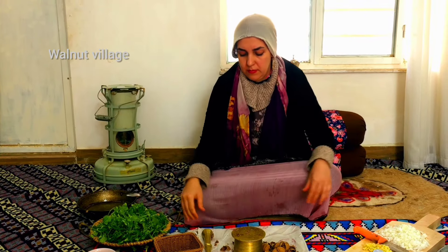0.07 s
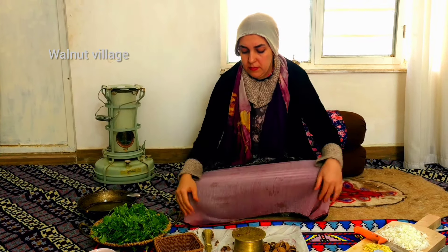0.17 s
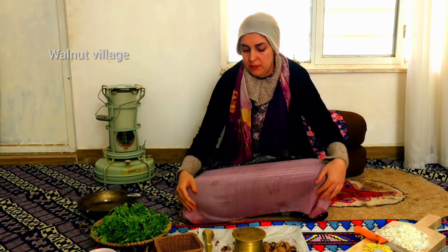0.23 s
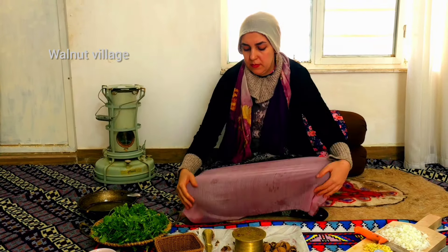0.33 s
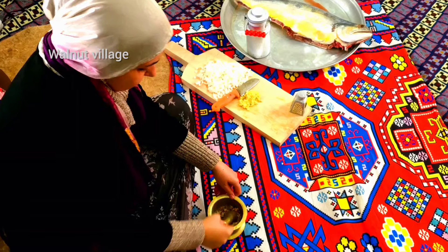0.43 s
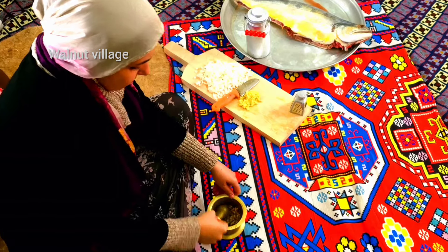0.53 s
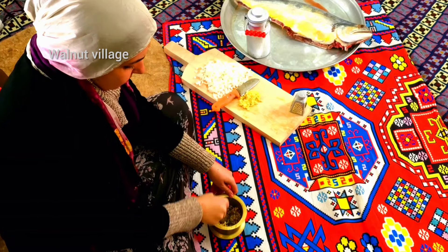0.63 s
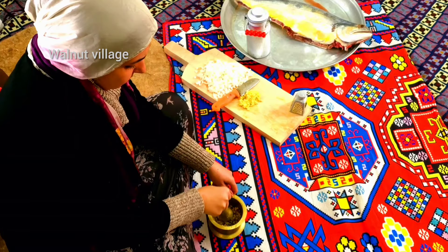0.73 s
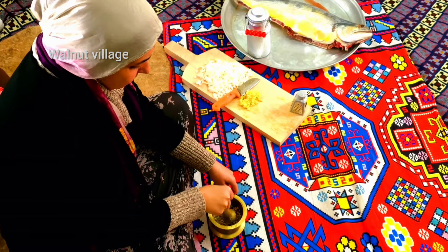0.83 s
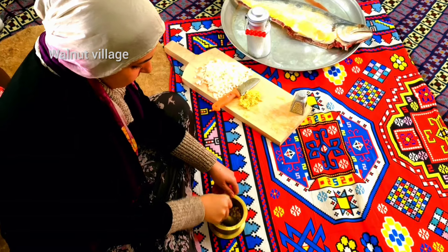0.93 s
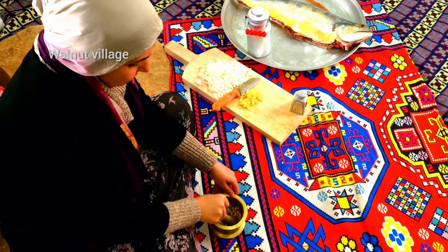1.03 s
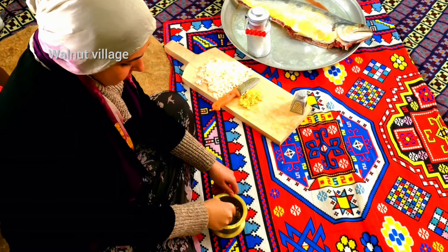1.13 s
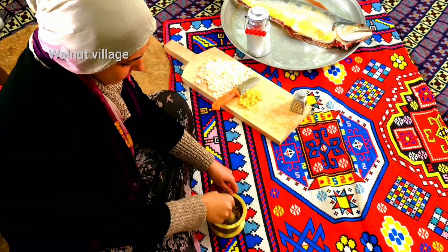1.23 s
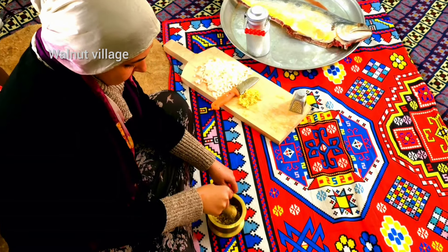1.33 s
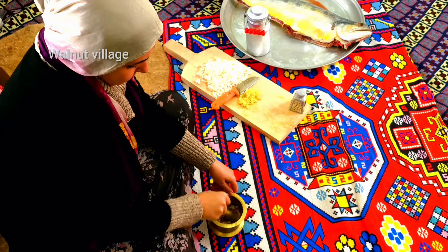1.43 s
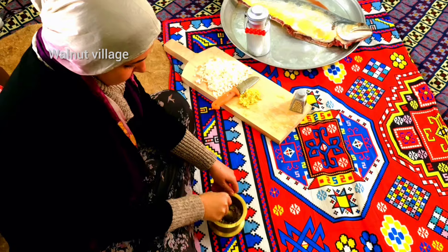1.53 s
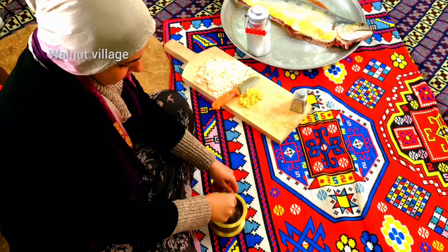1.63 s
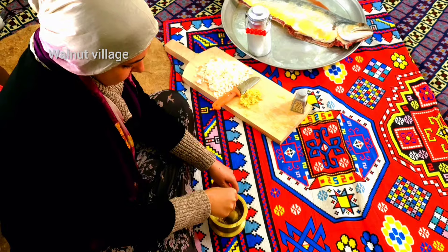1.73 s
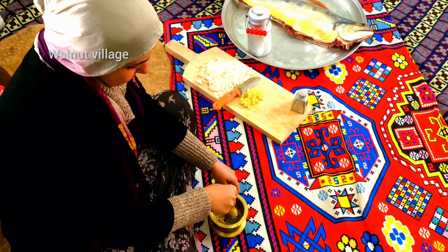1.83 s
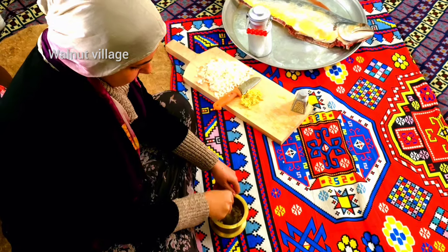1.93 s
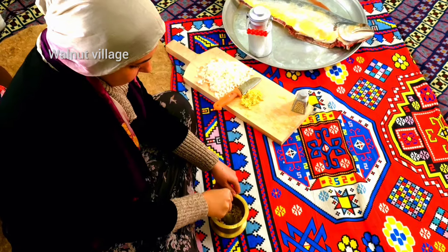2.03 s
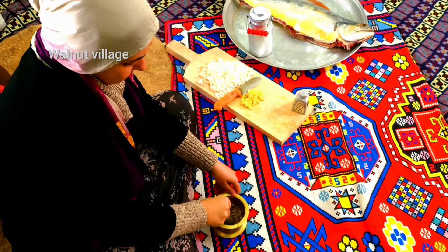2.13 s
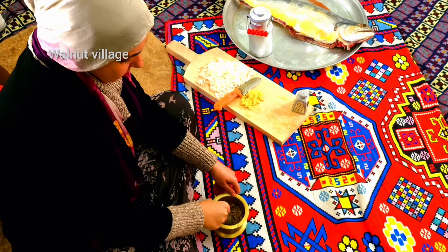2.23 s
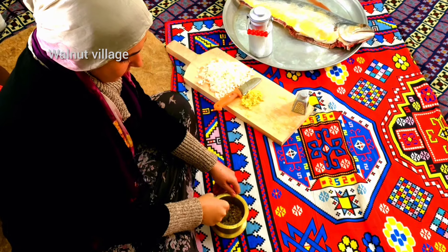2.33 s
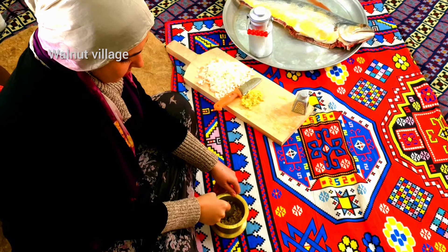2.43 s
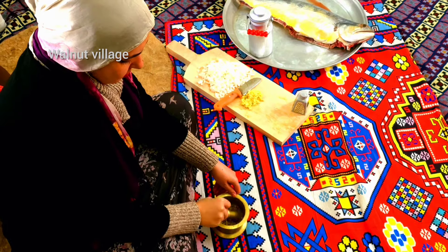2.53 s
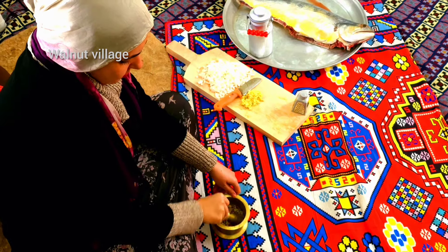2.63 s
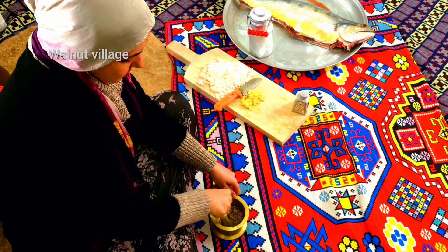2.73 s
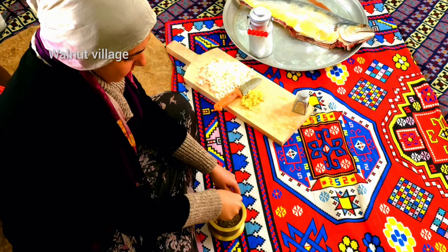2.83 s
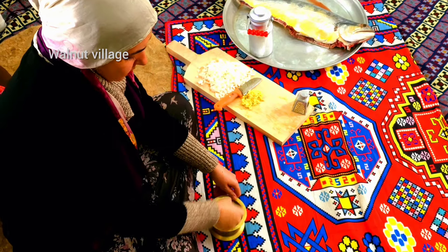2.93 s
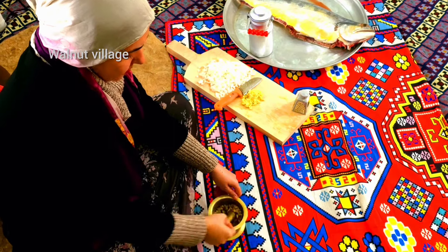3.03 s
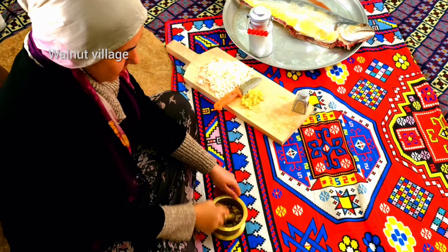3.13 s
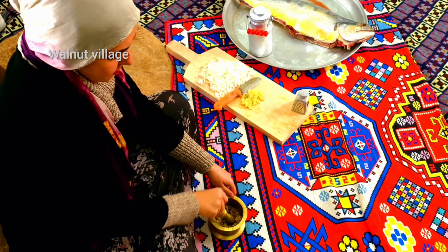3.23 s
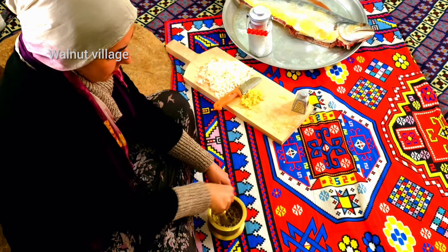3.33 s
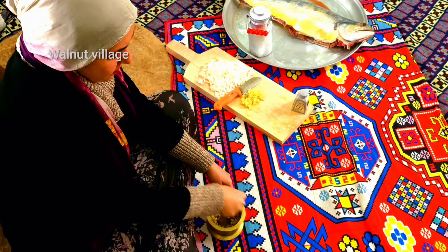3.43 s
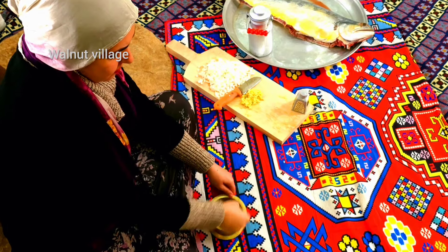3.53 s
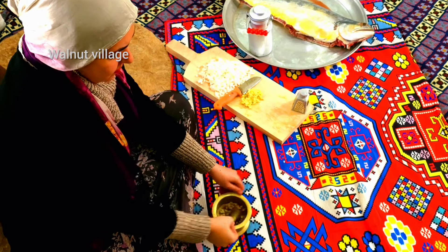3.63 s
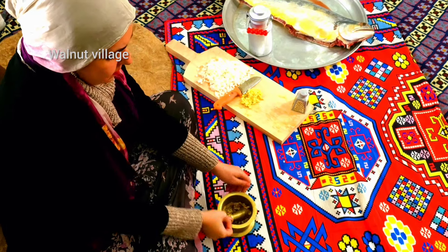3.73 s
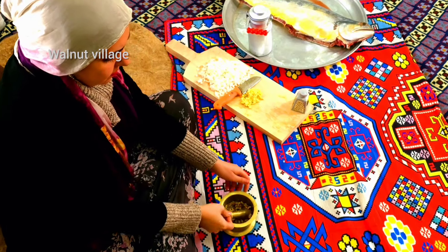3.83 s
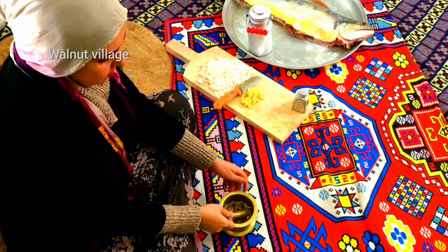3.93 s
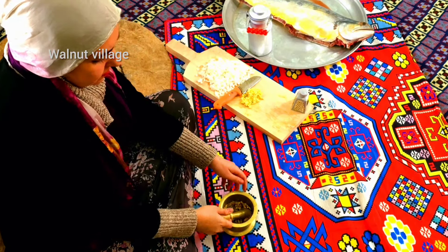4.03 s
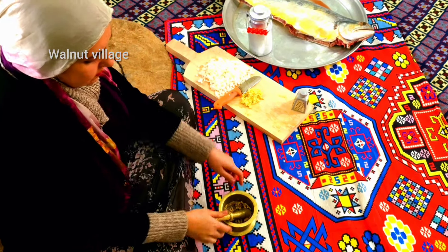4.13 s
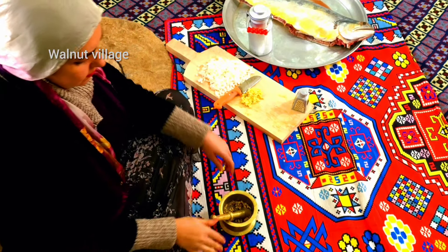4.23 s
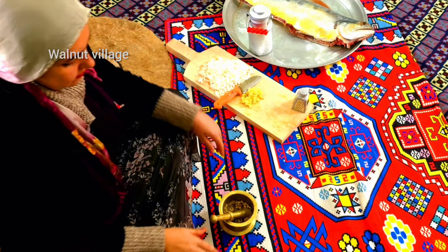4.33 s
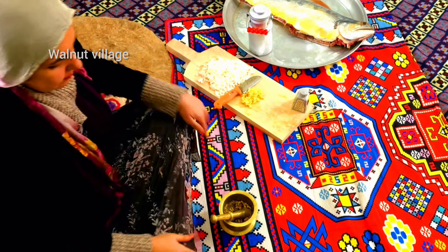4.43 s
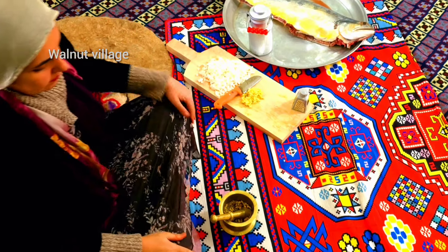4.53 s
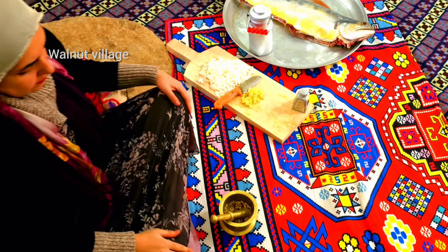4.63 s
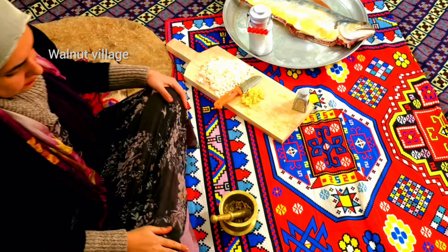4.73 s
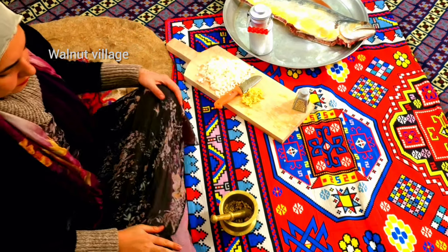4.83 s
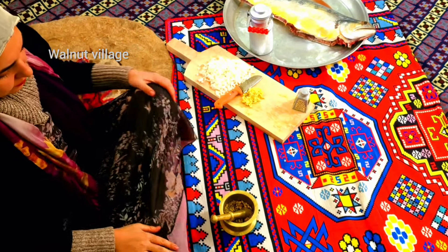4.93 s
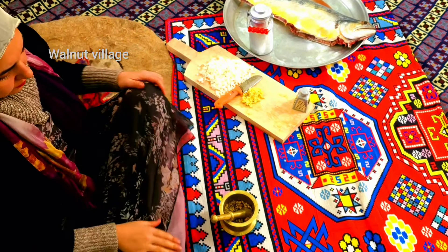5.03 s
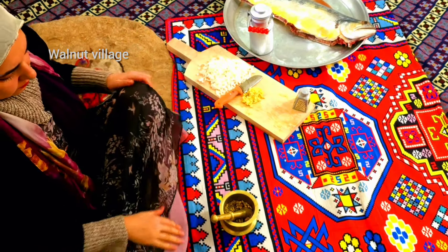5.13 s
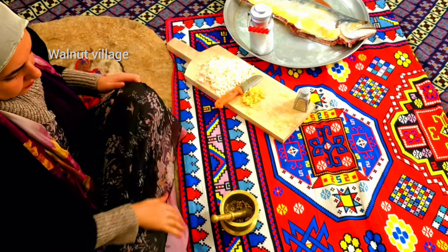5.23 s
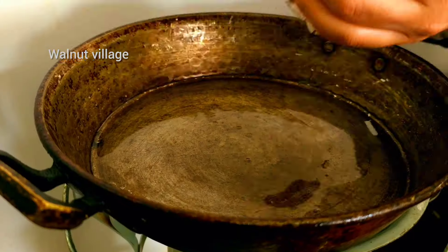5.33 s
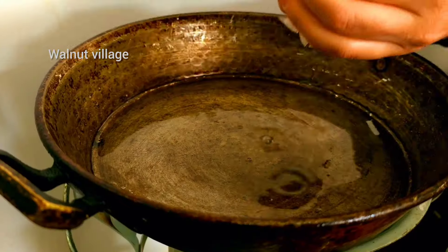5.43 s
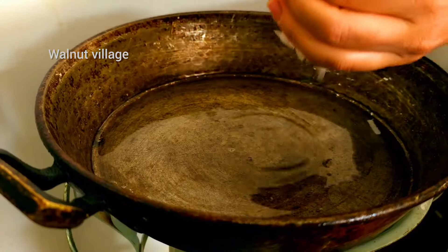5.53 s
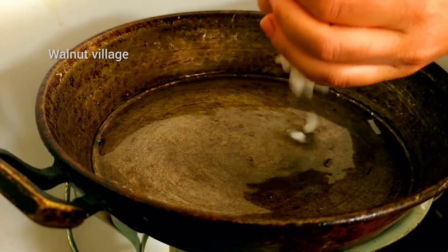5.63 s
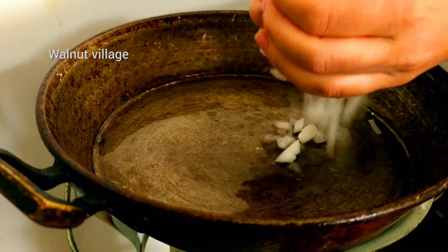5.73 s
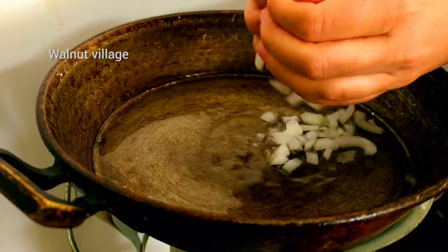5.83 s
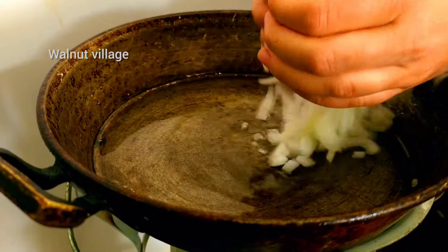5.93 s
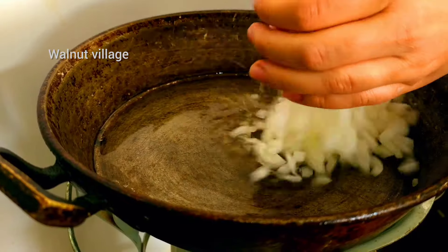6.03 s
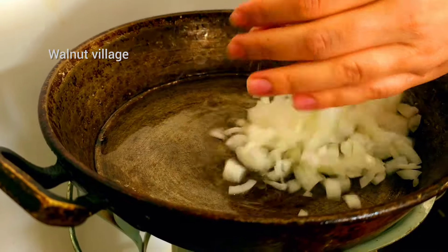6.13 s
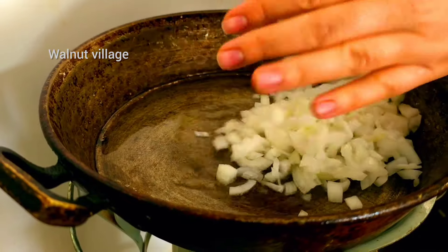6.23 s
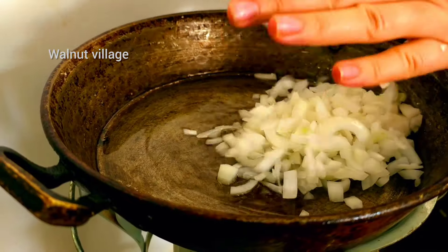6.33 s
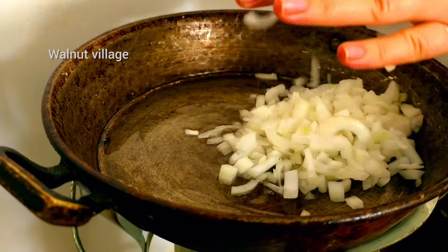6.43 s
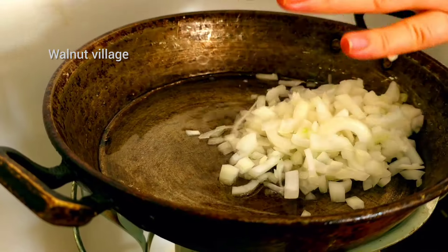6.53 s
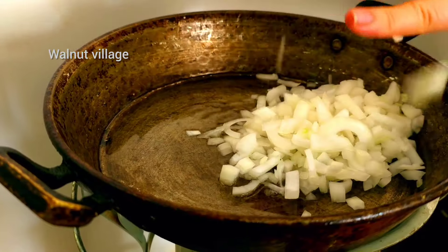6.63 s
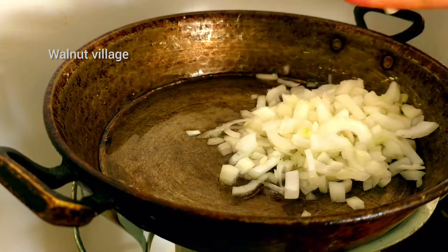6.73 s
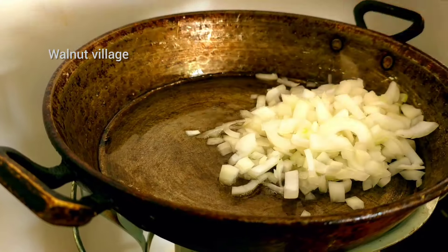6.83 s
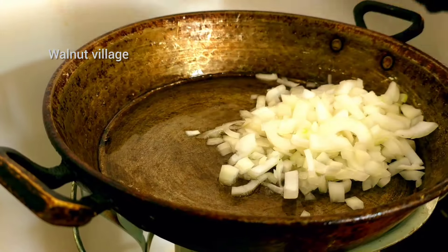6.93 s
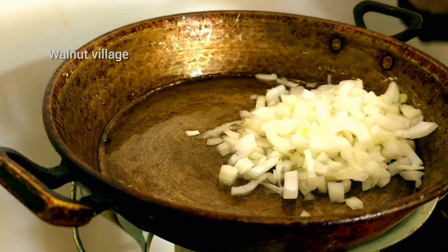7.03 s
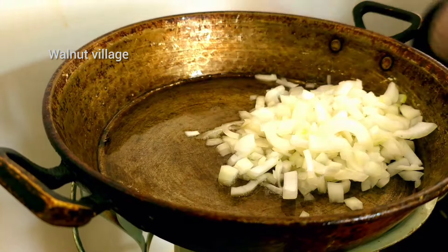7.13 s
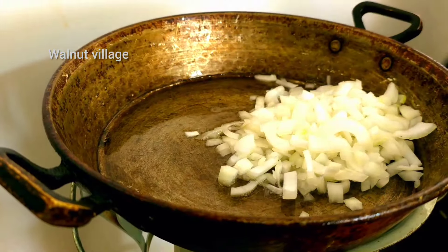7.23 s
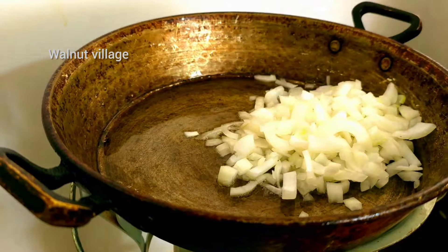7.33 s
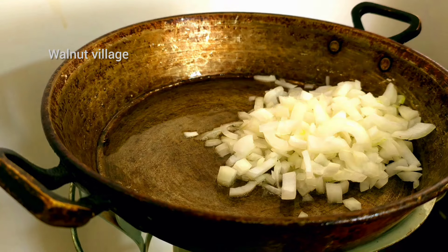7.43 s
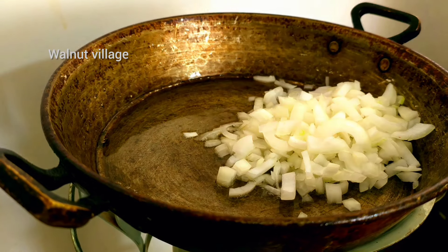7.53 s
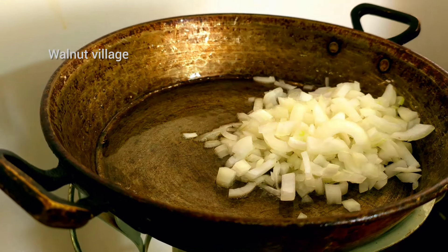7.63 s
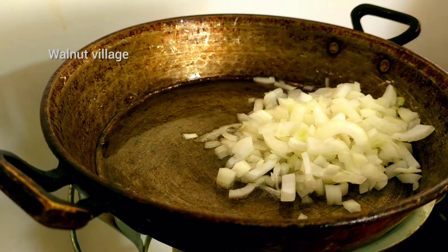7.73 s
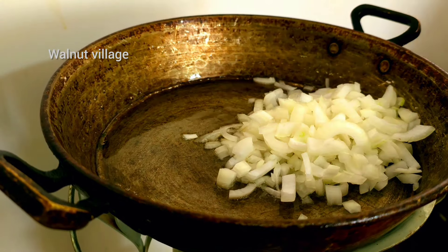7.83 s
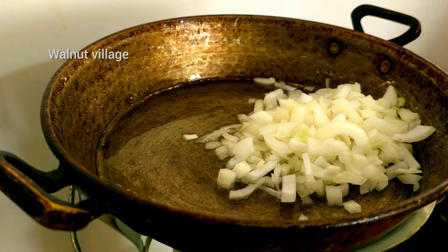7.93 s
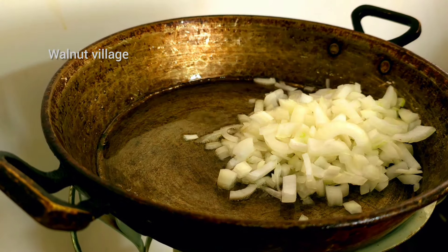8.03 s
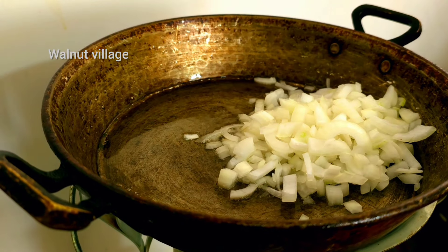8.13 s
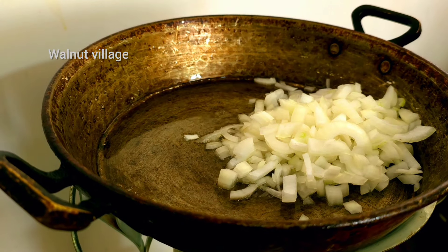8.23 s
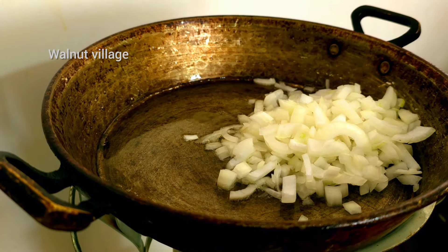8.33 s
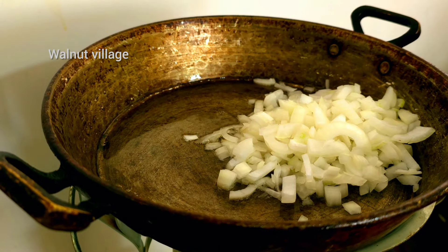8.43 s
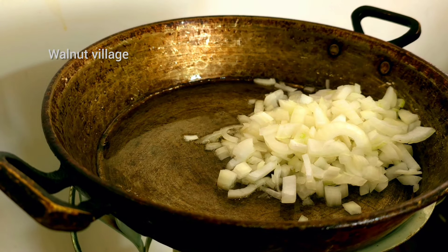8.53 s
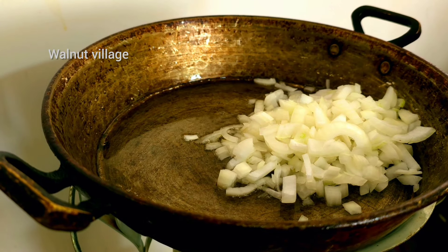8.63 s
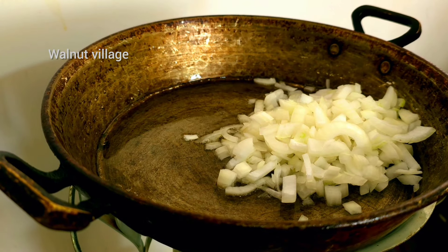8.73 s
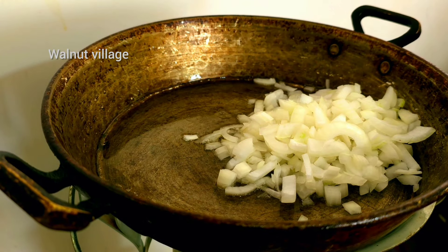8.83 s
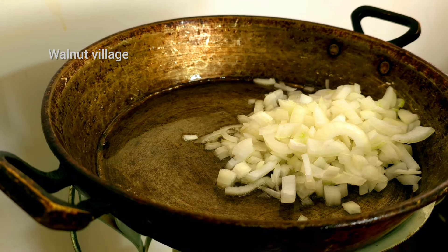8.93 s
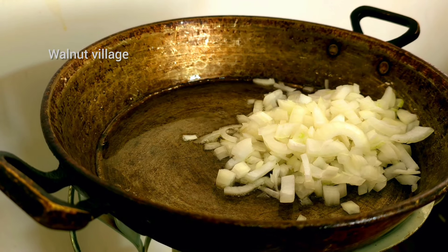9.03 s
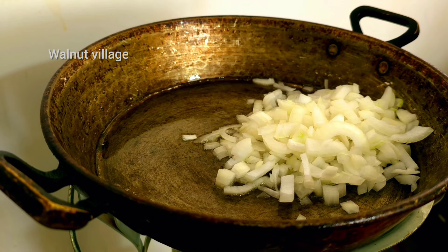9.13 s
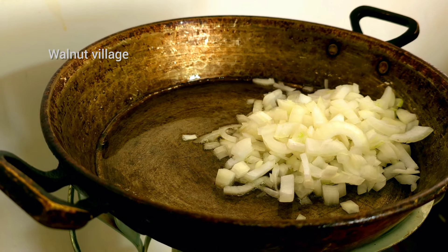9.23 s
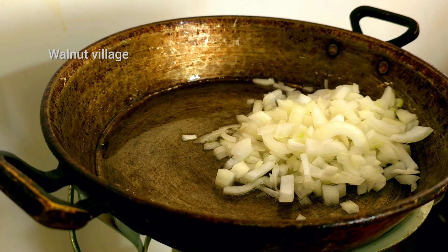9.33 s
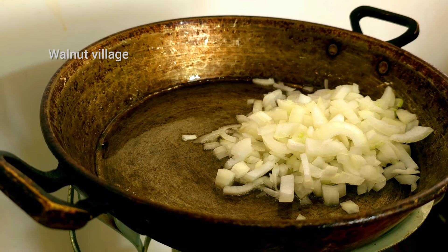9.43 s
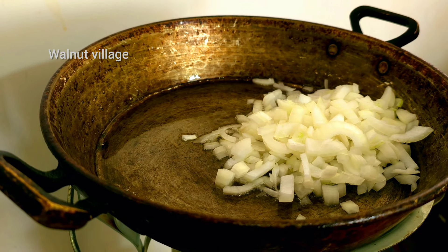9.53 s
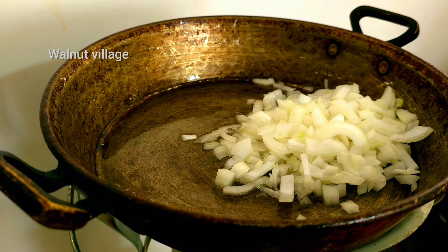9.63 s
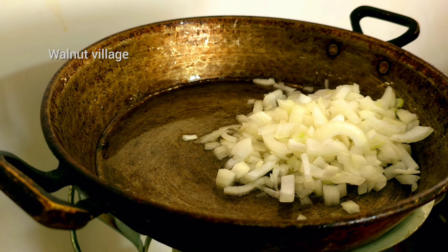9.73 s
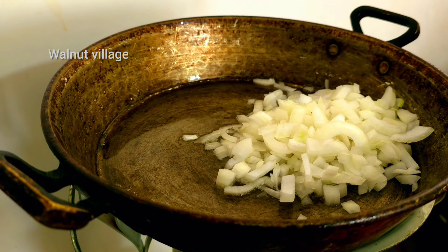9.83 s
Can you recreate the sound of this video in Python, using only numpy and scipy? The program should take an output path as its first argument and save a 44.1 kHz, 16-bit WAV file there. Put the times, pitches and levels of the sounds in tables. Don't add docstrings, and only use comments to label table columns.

```python
import sys
import numpy as np
from scipy import signal
from scipy.fft import rfft, irfft, next_fast_len
from scipy.io import wavfile
from scipy.ndimage import uniform_filter1d

SR = 44100
rng = np.random.default_rng(int(sys.argv[2]) if len(sys.argv) > 2 else 0)


def boost_factor(decibels):
    exponent = np.asarray(decibels, float) / 20
    return 10 ** exponent


def dump_mix(stems):
    frames = np.atleast_2d(stems).T
    limited = np.clip(frames, -1, 1)
    pcm = np.round(limited * 32767).astype(np.int16)
    wavfile.write(sys.argv[1], SR, pcm)


N = 435246
SIZE = next_fast_len(N)
BIN_HZ = np.maximum(np.fft.rfftfreq(SIZE, 1 / SR), 1)
EARS = np.array([[1], [-1]])


def rms_one(x):
    return x / np.sqrt(np.mean(x ** 2) + 1e-20)


def at_hz(points, hz):
    table_hz, value = np.transpose(points)
    return np.interp(np.log(hz), np.log(table_hz), value)


def coloured(x, spectrum):
    return irfft(rfft(x, SIZE) * boost_factor(at_hz(spectrum, BIN_HZ)), SIZE)[..., :N]


# f/Hz, correlation/1
LIKENESS = [(60, 0.9), (180, 0.8), (550, 0.88), (1650, 0.26), (4970, 0.16), (15000, 0.03)]


def stereo_noise(spectrum):
    alike = np.clip(at_hz(LIKENESS, BIN_HZ), 0, 1)
    mid, side = rfft(rng.standard_normal((2, SIZE)))
    both = np.sqrt(1 + alike) * mid + np.sqrt(1 - alike) * side * EARS
    return rms_one(irfft(both * boost_factor(at_hz(spectrum, BIN_HZ)), SIZE)[:, :N])


def low_band(low_hz, high_hz):
    sos = signal.butter(2, [low_hz, high_hz], "band", fs=SR, output="sos")
    return rms_one(signal.sosfilt(sos, rng.standard_normal(N)))


def above(x, hz):
    return signal.sosfilt(signal.butter(2, hz, "high", fs=SR, output="sos"), x)


def drift(rate_hz):
    r = np.exp(-80 * np.pi * rate_hz / SR)
    slow = signal.lfilter([1], [1, -2 * r, r * r], rng.standard_normal(N // 40 + 2002))[2000:]
    return np.interp(np.arange(N) / 40, np.arange(len(slow)), rms_one(slow))


def swells(rows):
    t = np.arange(0, N + 32, 32) / SR
    gain = sum(boost_factor(db - 20 * np.maximum((s - t) / rise, (t - s) / fall)) for s, db, rise, fall in rows)
    return np.interp(np.arange(N) / SR, t, gain)


def clicks(times, gains):
    out = np.full(N, 1e-18)
    np.add.at(out, np.round(np.asarray(times) * SR).astype(int), gains)
    return out


def ring(x, hz, t60):
    r, w = boost_factor(-60 / (t60 * SR)), 2 * np.pi * hz / SR
    return signal.lfilter([0, np.sin(w)], [1, -2 * r * np.cos(w), r * r], x)


def dying(x, t60):
    return signal.lfilter([1], [1, -boost_factor(-60 / (t60 * SR))], x)


def glide(start_hz, end_hz, u):
    return np.sin(2 * np.pi * np.cumsum(start_hz + (end_hz - start_hz) * u) / SR)


def add(out, s, piece):
    i = round(s * SR)
    out[..., i:i + piece.shape[-1]] += piece[..., :N - i]


def room(x):
    t60_s, send_db = 0.33, -10
    t = np.arange(int(.6 * SR)) / SR
    mid, side = rng.standard_normal((2, len(t))) * boost_factor(-60 * t / t60_s) * (t > .003)
    tail = signal.lfilter([1], [1, -.4], mid + above(side, 650) * EARS)
    tail /= np.sqrt(np.sum(tail ** 2) / 2)
    return boost_factor(send_db) * signal.fftconvolve(x[None], tail, axes=1)[:, :N]


# f/Hz, density/dB
AIR = [(530, -49.5), (900, -11.5), (1340, -30), (1520, -9), (1680, -21), (2160, 0.5), (2430, -24.5),
       (3970, -19), (4520, -6.5), (5890, -21.5), (7130, -8.5), (7840, -33), (10500, -22.5), (15700, -38)]
ROOM = [(59, -73.5), (100, -29), (183, -4), (285, -7), (324, -8), (372, -22), (404, 2), (443, -18.5),
        (900, -40), (1170, -66.5), (1980, -120)]
DULL = [(410, -53.5), (700, -25.5), (1150, -10.5), (1600, -4), (2300, -6.5), (4000, -9.5), (5200, -50.5),
        (8800, -120)]
BRIGHT = [(1470, -38), (2500, -6.5), (5320, 0.5), (5890, -3.5), (7360, -1.5), (10700, -8), (14900, 1),
          (15800, -19)]
# peak t/s, level/dB, rise/s, fall/s
DRAGS = [
    (0.05, -66.5, 0.64, 0.63),
    (1.05, -79, .1, 0.16),
    (2.41, -79, 0.16, 0.18),
    (3.0, -73, 0.6, 1),
    (3.6, -72.5, 0.053, 0.23),
    (4.24, -71.5, 0.081, 0.99),
    (4.36, -74, 0.34, 0.12),
    (4.47, -71, 0.062, 0.12),
    (5.254, -48.5, 0.0031, 0.01),
]
# peak t/s, level/dB, rise/s, fall/s
SWISHES = [
    (.3, -67.5, 0.1, 0.19),
    (2.41, -76.5, 0.15, 0.51),
    (2.98, -76, 1, 0.93),
    (3.6, -86, 0.42, 0.13),
    (4.48, -65.5, 0.069, 0.41),
    (5.0, -63, 0.1, 0.85),
    (5.25, -79, 1, 0.53),
]
# peak t/s, level/dB, rise/s, fall/s
SHIFTS = [
    (0.0, -73, 0.12, 0.44),
    (.36, -78.5, 0.21, 0.075),
    (1.6, -70.5, 0.16, 0.19),
    (2.05, -78.5, 0.16, 0.6),
    (5.27, -68, .05, 0.51),
]
# peak t/s, level/dB, rise/s, fall/s
SCUFF = [
    (4.23, -63.5, 0.037, 0.17),
    (4.3, -65, 0.087, 0.087),
]
# peak t/s, level/dB, rise/s, fall/s
RUB = [
    (2.89, -75, .04, .08),
    (3.0, -72, .05, .1),
    (3.33, -76, 0.066, .15),
    (3.5, -81, 0.087, .15),
]


def living_room():
    drone_hz, drone_db = 410, -74
    t = np.arange(N) / SR
    drone = np.sqrt(2) * boost_factor(drone_db + 0.4 * drift(3.4)) * np.sin(2 * np.pi * drone_hz * t)
    still = boost_factor(-75.5 - 2.5) * stereo_noise(AIR) + boost_factor(-67) * stereo_noise(ROOM)
    heavy = (boost_factor(-89) + swells(DRAGS)) * boost_factor(3.9 * drift(14)) * stereo_noise(DULL)
    thin = (boost_factor(-87) + swells(SWISHES)) * boost_factor(1.0 * drift(13)) * stereo_noise(BRIGHT)
    shake = (boost_factor(-83.5) + swells(SHIFTS)) * boost_factor(2.5) * low_band(49, 260)
    grain = rng.standard_normal((2, N))
    scuff = swells(SCUFF) * rms_one(ring(grain, 1640, 0.008))
    rub = swells(RUB) * rms_one(ring(grain, 3650, 0.03))
    return still + drone + heavy + thin + shake + scuff + rub


# t/s, level/dB, start f/Hz, end f/Hz, length/s
THUMPS = [
    (1.435, -42, 96, 161, 0.11),
    (1.45, -50, 68, 80, 0.093),
    (1.59, -57, 63.4, 48, 0.14),
    (1.6, -59, 127, 159.4, 0.094),
    (1.93, -53.5, 178, 124, 0.13),
    (1.94, -57, 96, 84.7, 0.082),
    (2.05, -61, 111, 127, 0.1),
]


def wobble():
    out = np.zeros(N)
    for s, db, start_hz, end_hz, length in THUMPS:
        u = np.arange(int(length * SR)) / (length * SR)
        add(out, s, boost_factor(db) * np.sin(np.pi * u ** 1.04) * glide(start_hz, end_hz, u))
    return out


# f/Hz, density/dB
CRUNCH = [(290, -0.5), (500, -8), (748, -17.5), (1290, -8.5), (1510, -19), (2040, -4), (3580, -3),
          (9790, -19.5), (13200, -10.5), (15500, -32)]
# t/s, crunch/dB, thump/dB, thump f/Hz, crunch t60/s
POUNDS = [
    (0.9527, -41, -70, 115, 0.15),
    (1.4471, -33.5, -51, 112.7, 0.076),
    (1.9375, -39, -63.5, 117, 0.14),
    (4.4784, -49, -56.5, 466, 0.021),
    (5.254, -49, -69, 460, 0.033),
]


def pounding():
    out, t = np.zeros(N), np.arange(int(.4 * SR)) / SR
    grit = rms_one(coloured(rng.standard_normal(N), CRUNCH))
    for s, crunch_db, thump_db, hz, t60 in POUNDS:
        swell = (1 - np.exp(-t / (0.011 * t60))) ** 2
        puff = grit[round(s * SR):][:len(t)] * swell * boost_factor(crunch_db - 6.0 - 60 * t / t60)
        floor = np.sin(2 * np.pi * hz * t) + np.sin(2 * np.pi * 0.7 * hz * t)
        add(out, s - t60 / 50, puff + floor * boost_factor(thump_db + 6.5 - 60 * t / (1.5 * t60)))
    return out


# f/Hz; then level/dB, t60/s
SHIMMER_HZ = [4875, 5782, 6092, 6918, 7260, 7773, 8800, 9141, 9418, 9800, 10150, 11125, 11930, 12280]
SHIMMER = [(-6.5, 0.3), (2.5, 0.14), (-6.5, 0.41), (-4.5, 0.11), (2, 0.25), (-18.5, 0.063), (-13, 0.092),
           (-11, 0.15), (-14.5, 0.16), (-9.5, 0.17), (-11, 0.3), (-14, 0.17), (-10, 0.14), (-11.5, 0.15)]
# f/Hz; then level/dB, t60/s
PESTLE_TOP_HZ = [7542, 9028, 12640, 13310, 13670, 14320, 14880, 15310]
PESTLE_TOP = [(-14.5, .15), (-14, .12), (-11, 0.16), (-15.5, .1), (-18, .12), (-31, .1), (-17, .15), (-31, .08)]
# f/Hz, density/dB
CLATTER = [(120, -64.5), (200, -13), (1010, -15.5), (1380, -8), (1510, -7), (3240, -19.5), (3550, -10),
           (4250, -20.5), (4550, -46.5), (5910, -13), (8200, -38.5), (9500, -14), (10700, -35),
           (12000, -19), (13700, -40.5), (14900, -26.5), (15700, -41.5)]
# f/Hz, gain/dB
RUMBLE = [(3000, -1), (3700, -3.5), (4500, -10), (5500, 0.5), (7600, -3), (8300, -6.5), (9300, -7),
          (15000, -10)]


def bowl(s, clatter_db, hum_db, second_db, high_db, place_rad, damping):
    hum = (1179, 1184.5), 0.71, hum_db - 0.5, place_rad   # halves/Hz, t60/s, level/dB, angle/rad
    second = (2970.5, 2973.5), 0.58, second_db + 6.0, -.5
    out = np.zeros(N)
    for (low_hz, high_hz), t60, db, turn in (hum, second):
        out += ring(clicks(s, boost_factor(db) * np.sin(turn)), low_hz, t60 * damping)
        out += ring(clicks(s, boost_factor(db) * np.cos(turn)), high_hz, t60 * damping)
    chance_db = rng.normal(0, 1.5, (len(s), len(SHIMMER + PESTLE_TOP)))
    buzz = rng.standard_normal(N)
    for k, (hz, (db, t60)) in enumerate(zip(SHIMMER_HZ + PESTLE_TOP_HZ, SHIMMER + PESTLE_TOP)):
        struck = clicks(s, boost_factor(high_db + db - 5.5 + chance_db[:, k]))
        struck += 0.064 * buzz * dying(struck, 0.14)
        t60 = t60 * damping ** .25
        out += ring(struck, hz, t60) - 0.31 * ring(struck, hz * 1.004, 1.3 * t60)
    blows = clicks(s, boost_factor(clatter_db - 8.0))
    noise = rms_one(coloured(rng.standard_normal(N), CLATTER))
    contact = 0.8 * noise * dying(blows, 0.01)
    rumble = 0.35 * coloured(noise, RUMBLE) * dying(blows, 0.17)
    thud = 0.053 * low_band(77, 660) * dying(blows, 0.62)
    return out + contact + rumble + thud


# t/s, clatter/dB, hum/dB, second mode/dB, place/rad
BLOWS = [
    (0.549, -17.5, -23, -40, -0.38),
    (2.4188, -36, -58.5, -65.5, 0.12),
    (2.5505, -19.5, -24, -44.5, -0.29),
    (3.6362, -34, -47.5, -48.5, 0.27),
    (3.9535, -26.5, -68, -36, 0.8),
]
UPPER_BELOW_DB = [7.7, 2.6, 15, 12, 12]
# t/s, until t/s, hum gain/dB, higher modes gain/dB
RESTS = [
    (0.673, 2.41, 3.5, -2.7),
    (2.487, 2.563, -1.5, 5),
    (2.599, 3.624, -10.5, 2),
    (2.726, 3.63, 6.5, -14.5),
    (4.029, 5.4, -5, -25),
]
# t/s, clatter/dB, hum/dB, second mode/dB, upper modes/dB
RATTLE = [(0.4234, -24, -38, -47, -38), (0.434, -21, -40, -38, -49), (0.4414, -24.5, -40.5, -45, -51),
          (0.4483, -22, -50, -32, -52), (0.4615, -33.5, -44.5, -32.5, -53.5),
          (0.4802, -25, -31.5, -30.5, -59.5), (0.503, -35, -46, -37, -59), (0.526, -36.5, -43, -30.5, -60),
          (2.562, -30.5, -42, -44, -48), (2.5829, -29, -42, -45, -55), (3.6317, -20, -40, -42, -44),
          (3.6352, -16, -40.5, -50, -54), (3.6448, -29, -36.5, -43, -52.5), (3.702, -35, -33, -31, -51),
          (3.709, -29, -41.5, -58, -64), (3.719, -29.5, -50, -42, -57), (3.956, -29, -60, -57, -45),
          (3.976, -31.5, -40, -46, -58), (4.002, -34, -43, -66.5, -68)]
# f/Hz; then level/dB, t60/s
PESTLE_HZ = [1513, 1696, 1846, 2090, 2137, 3020, 3610, 3714, 3887, 3960]
PESTLE = [(-6, .09), (-10.5, 0.072), (-4.5, .09), (-3, .06), (-4.5, 0.087), (-10.5, 0.22), (2, 0.18),
          (-16.5, .12), (-13, 0.2), (-20, .12)]


def mortar():
    s, clatter_db, hum_db, second_db, place_rad = np.transpose(BLOWS)
    free = bowl(s, clatter_db, hum_db, second_db, hum_db - UPPER_BELOW_DB, place_rad, damping=1.0)
    t, hum_mute_db, high_mute_db = np.arange(N) / SR, 0, 0
    for at, until, hum, high in RESTS:
        resting = np.clip((t - at) / 0.023, 0, 1) * (t < until)
        hum_mute_db = hum_mute_db + hum * resting
        high_mute_db = high_mute_db + high * resting
    low = coloured(free, [(1600, 0), (2300, -60)])
    free = low * boost_factor(hum_mute_db) + (free - low) * boost_factor(high_mute_db)

    s, clatter_db, hum_db, second_db, upper_db = np.transpose(RATTLE)
    choked = bowl(s, clatter_db, hum_db, second_db, upper_db + 1.5, 0.063, damping=0.14)
    firm_db = -25
    knocks = clicks(s, boost_factor(-38.5 + 1.76 * (clatter_db - firm_db)))
    pestle = sum(boost_factor(db) * ring(knocks, hz, t60) for hz, (db, t60) in zip(PESTLE_HZ, PESTLE))
    return above(free + choked + pestle, 170)


# f/Hz, density/dB
FLAME = [(71, -29), (120, -4.5), (161, -54), (177, -4), (219, -11), (257, 8.5), (427, -14), (500, -8.5),
         (1500, -33), (1950, -51), (3300, -120)]
# peak t/s, level/dB, rise/s, fall/s
NUDGES = [
    (5.405, -60, 0.046, 0.17),
    (6.0, -52.5, 0.26, 0.54),
    (6.36, -41, 0.029, 0.17),
    (6.75, -58, 0.15, 0.57),
    (7.2, -67, 0.083, 0.44),
    (7.5, -62, 0.1, 0.33),
    (7.97, -65, 0.073, 0.12),
    (8.63, -61.5, 0.18, 1),
    (9.73, -71, 0.56, 0.33),
]
# peak t/s, level/dB, rise/s, fall/s
ROCKING = [
    (5.405, -50, .05, 0.045),
    (6.37, -32, 0.014, 0.31),
]


def stove():
    t, lead_rad = np.arange(N) / SR, 0.2 * EARS
    rock = np.sin(2 * np.pi * 28.2 * t + lead_rad) + 0.25 * np.sin(2 * np.pi * 50 * t + lead_rad)
    sway = np.sqrt(2) * swells(ROCKING) * rock * boost_factor(.5 * EARS)
    bump = low_band(68, 111.3) + 0.28 * low_band(58, 100) * EARS
    return (boost_factor(-116) + swells(NUDGES)) * bump + boost_factor(-65.5) * stereo_noise(FLAME) + sway


# f/Hz, density/dB
SIMMER = [(88, -25), (150, -59), (173, -18), (311, -9.5), (450, -12), (675, -3.5), (1100, -6.5),
          (1360, 3.5), (1590, -4.5), (2600, -6), (3380, -18), (5720, -120)]
# peak t/s, level/dB, rise/s, fall/s
POURING = [
    (5.6, -48.5, 0.072, 1),
    (5.9, -36.5, 0.075, 0.2),
    (6.15, -41.5, 0.5, 1),
]


def simmer(fizz_db):
    settled_db = -37.5
    level = boost_factor(-54.5 + 1.17 * (fizz_db - settled_db)) + swells(POURING)
    return level * boost_factor(3.23 * drift(15.0)) * stereo_noise(SIMMER)


# f/Hz, density/dB
FIZZ = [(880, -58), (1500, -7.5), (1810, -12.5), (1980, -8), (2710, -6.5), (2930, -1), (4610, 1),
        (7040, -2.5), (8580, -2.5), (10900, -6), (14900, -3.5), (15800, -10.5)]


def fizz(level_db):
    bursts_per_s = 6000 * boost_factor(3 * drift(25))
    sizes = boost_factor(4.3 * np.minimum(rng.exponential(1, (2, N)), 5)) * rng.choice([-1, 1], (2, N))
    born = sizes * (rng.random((2, N)) < bursts_per_s / SR)
    dealt = rng.integers(0, 12, (2, N))
    grains = 0
    for k, hz in enumerate(np.geomspace(2000, 15000, 12)):
        grains = grains + ring(born * (dealt == k) + 1e-18, hz, 15.0 / hz) * np.sqrt(hz)
    grains = rms_one(coloured(grains, FIZZ))
    return boost_factor(level_db + .5 * drift(18)) * rms_one(0.84 * grains + stereo_noise(FIZZ))


# t/s, level/dB
GULPS = [(6.552, -42), (6.63, -25.5), (6.712, -26), (6.827, -65), (6.859, -30.5), (6.917, -39),
         (6.953, -33), (7.001, -36), (7.042, -38), (7.107, -35), (7.131, -29.5), (7.185, -39),
         (7.359, -27.5), (7.439, -29), (7.56, -33.5), (7.612, -26), (7.716, -28.5), (7.831, -31),
         (8.022, -31), (8.234, -39), (8.661, -38.5), (8.988, -39), (9.039, -38), (9.35, -48), (9.489, -41),
         (9.8, -43), (5.6885, -26.5), (8.037, -32), (8.065, -30), (8.265, -34.5)]


def gulps():
    s, db = np.transpose(GULPS)
    note = rms_one(ring(rng.standard_normal(N), 1328, 0.046))
    return (low_band(530, 1890) + boost_factor(-5.5) * note) * dying(clicks(s, boost_factor(db - 10)), 0.047)


# t/s, level/dB, note f/Hz
POPS = [(6.7251, -40, 5650), (6.7461, -19, 3760), (6.8578, -27, 5700), (6.9236, -36, 4430),
        (6.9543, -22, 4600), (7.2644, -40, 5640), (7.464, -31, 2930), (8.0542, -17, 3380),
        (8.0865, -31, 3230), (8.1828, -22.5, 4500), (7.759, -25, 2280), (8.277, -27, 2990),
        (8.3474, -25, 2960), (8.358, -23, 6220), (9.354, -21.5, 5000), (9.4275, -26, 6020),
        (9.7374, -28, 4600)]


def pops():
    length_s, rise = 0.0068, 0.053
    out, u = np.zeros((2, N)), np.arange(int(length_s * SR)) / (length_s * SR)
    for (s, db, hz), (side, turn) in zip(POPS, rng.normal(0, 1, (len(POPS), 2))):
        phase = 2 * np.pi * np.cumsum(hz * (1 + rise * (u - .5))) / SR + 0.76 * turn * EARS
        add(out, s, boost_factor(db - 6.5 + 1.03 * side * EARS) * np.sin(np.pi * u ** 0.77) * np.sin(phase))
    return out


# t/s, level/dB, note f/Hz
SPITS = [(5.4101, -26.5, 4370), (5.46, -23, 4230), (5.593, -19.5, 4200), (5.6778, -25, 4700),
         (5.6879, -19.5, 3930), (5.8632, -10, 5740), (5.8734, -13, 4360), (5.91, -14, 5140),
         (5.882, -14, 2000), (5.925, -15, 1890), (6.051, -8, 2050), (6.243, -15.5, 4870),
         (5.967, -15, 5100), (6.0035, -11.5, 3340), (6.0492, -11, 3830), (6.084, -11, 6430),
         (6.1094, -11, 4430), (6.1615, -12, 4100), (6.2797, -20, 3750), (6.2976, -12.5, 5340),
         (6.345, -19, 8600), (6.3965, -15.5, 4730), (6.5086, -14, 6100), (6.7259, -22, 8380),
         (6.922, -18.5, 3700), (8.053, -20, 3600), ]
# t/s, level/dB
CRACKS = [(5.4066, -51), (5.6885, -25.5), (5.7258, -40.5), (5.7387, -42), (5.752, -44), (5.8075, -34),
          (5.8365, -35), (5.8647, -23.5), (5.8731, -19.5), (5.909, -24), (6.007, -22.5), (5.925, -29),
          (5.9685, -30.5), (6.0509, -32), (6.0708, -26), (6.0838, -20.5), (6.1078, -25), (6.1629, -22),
          (6.2425, -26), (6.28, -38), (6.2995, -37), (6.3477, -28), (6.3972, -22.5), (6.491, -39.5),
          (6.5097, -20), (6.726, -29.5), (6.924, -29), (6.954, -29.5), (7.565, -33.5), (7.758, -45),
          (8.2727, -39), (8.359, -40), (9.355, -37), (9.738, -38.5)]
# t/s, level/dB, start f/Hz, end f/Hz, length/s
SQUEALS = [
    (5.431, -33.5, 3020, 6800, 0.0086),
    (8.032, -40.5, 2390, 4840, 0.028),
    (8.065, -35.5, 4570, 8900, 0.01),
    (8.349, -40, 3275, 7300, 0.013),
]
# peak t/s, level/dB, rise/s, fall/s
SEETHE = [
    (5.68, -38, 0.011, .05),
    (5.737, -36.5, 0.018, 0.089),
    (5.785, -42.5, 0.069, .04),
    (5.81, -38, 0.017, .1),
    (5.855, -43, 0.028, .03),
]


def spits():
    splash_until_s = 5.63
    out, t = np.zeros((2, N)), np.arange(int(.1 * SR)) / SR
    for (s, db, hz), wet in zip(SPITS, rng.standard_normal((len(SPITS), 2, len(t)))):
        t60 = .12 if s < splash_until_s else .018
        burst = rms_one(ring(wet + 0.097 * wet[::-1], hz, 7.4 / hz))
        add(out, s, burst * boost_factor(db - 6.0 - 60 * t / t60))
    for (s, db), dry in zip(CRACKS, rng.standard_normal((len(CRACKS), 2, len(t)))):
        dry = 0.45 * dry + 0.85 * dry.mean(axis=0) + 2.2 * (t == 0)
        fall = boost_factor(db + 5.0 - 60 * t / 0.003) + boost_factor(db - 5.5 - 60 * t / 0.018)
        add(out, s, signal.lfilter([1.3, -.7], [1], dry) * fall)
    for s, db, start_hz, end_hz, length in SQUEALS:
        u = np.arange(int(length * SR)) / (length * SR)
        rough = 1 + 7.8 * uniform_filter1d(rng.standard_normal(len(u)), size=12)
        add(out, s, boost_factor(db) * np.sin(np.pi * u) * rough * glide(start_hz, end_hz, u ** 2))
    seething = rms_one(ring(rng.standard_normal((2, N)), 4600, 0.0017))
    out += swells(SEETHE) * boost_factor(3.0 * drift(36)) * seething
    return above(out, 620)


# f/Hz; then level/dB, t60/s
PAN_HZ = [575, 700, 1036, 1174, 1206, 1244, 1366, 1600, 1735, 1860, 2005, 2401, 2955, 4517]
PAN = [(5.5, 0.11), (18, 0.089), (-9, 0.27), (-21, 0.15), (-16, 0.41), (-12, 0.4), (5.5, 0.16), (3.5, 0.15),
       (3, 0.086), (2, 0.11), (-11, 0.18), (-6, 0.4), (18, 0.29), (-10, 0.076)]
# f/Hz, level/dB, t60/s
BARE_PAN = [(697, -8.5, .2), (1030, -27, .4), (1179, -7, .35), (1242, -7, 0.47), (1352, 9, 0.095),
            (1940, -12, 0.15), (2390, -18, 0.37), (2980, -11, .14)]
# t/s, level/dB, note f/Hz
DROPS = [(5.408, -11.5, 1280), (5.589, -18.5, 1730), (5.642, -29, 574), (5.752, -31, 573),
         (5.8, -28.5, 574), (5.816, -16, 1620), (5.832, -21, 1250), (5.863, -26, 774), (5.892, -15, 1680),
         (5.982, -22, 560), (6.005, -17.5, 630), (6.038, -16.5, 1400), (6.05, -16, 757), (6.086, -15, 1390),
         (6.107, -16, 1300), (6.122, -9.5, 1240), (6.14, -13.5, 1390), (6.168, -19.5, 1390),
         (6.203, -16, 1340), (6.246, -15.5, 1260), (6.266, -24, 1010), (6.415, -19, 1250),
         (6.451, -18.5, 1330), (6.507, -25.5, 814)]


def pan_knocks():
    covered_s, smother = 5.62, 0.21
    s, db, note_hz = np.transpose(DROPS)
    out, t = np.zeros(N), np.arange(int(.06 * SR)) / SR
    chance_db = rng.normal(0, 1.0, (len(s), len(PAN)))
    for k, (hz, (mode_db, t60)) in enumerate(zip(PAN_HZ, PAN)):
        near_db = -38 * np.abs(np.log2(hz / note_hz))
        strength = boost_factor(db + mode_db + near_db - 11.5 + chance_db[:, k])
        out += ring(clicks(s, strength * (s < covered_s) * (s > s[0])), hz, t60)
        out += ring(clicks(s, 0.72 * strength * (s >= covered_s)), hz, t60 * smother)
    for hz, mode_db, t60 in BARE_PAN:
        out += ring(clicks(s[:1], boost_factor(-26.5 + mode_db)), hz, t60)
    for (at, level_db, hz), wet in zip(DROPS, rng.standard_normal((len(s), len(t)))):
        patter = rms_one(ring(ring(wet, hz, 0.0039), hz, 0.0039)) * (1 - np.exp(-t / .0012))
        bare_db = -7 * (at < covered_s)
        add(out, at, patter * boost_factor(level_db - 5.5 + bare_db - 60 * t / 0.025))
    return above(out, 234)


# t/s, fizz level/dB
VIGOUR = [(5.405, -51), (5.565, -65.5), (5.7, -52.5), (5.79, -58), (5.83, -38), (5.95, -36), (6.07, -28),
          (6.24, -29.5), (6.4, -33), (6.6, -35.5), (6.9, -34.5), (7.05, -37.5), (7.58, -39.5), (8.0, -40),
          (8.45, -41), (9.13, -41.5), (9.87, -41.5)]
# from t/s, to t/s
CUTS = [
    (0.368, .418),
    (5.358, 5.404),
]


def scene():
    t = np.arange(N) / SR
    fizz_db = np.interp(t, *np.transpose(VIGOUR))
    brass = mortar() + pounding() + wobble()
    pan = pan_knocks() + gulps()
    spit = spits() + pops()
    frying = fizz(fizz_db) + simmer(fizz_db) + stove() + pan + spit
    out = np.where(t < CUTS[1][0], living_room() + brass * boost_factor(.2 * EARS), frying)
    out += room(0.8 * brass + pan + .7 * spit.mean(axis=0))
    for start, end in CUTS:
        out *= np.clip(np.maximum(start - t, t - end) / 0.0014, 0, 1)
    return out


def roll_off(x):
    return signal.sosfilt(signal.butter(12, 16840, fs=SR, output="sos"), x)


# f/Hz, left over right/dB
PORTS = [(60, -3.5), (130, 1.5), (290, 1), (640, 0), (1410, 0.5), (3100, 0.5), (8000, -1), (12500, 0.5)]
# f/Hz, phase/rad
LEFT_LEAD = [(250, 0), (600, .3), (1200, .6), (2000, 1), (3000, 1.4), (15000, 1.6)]


def record(dry):
    halves = [[(hz, sign * db / 2) for hz, db in PORTS] for sign in (1, -1)]
    dry = np.array([coloured(x, half) for x, half in zip(dry, halves)])
    lead_rad = at_hz(LEFT_LEAD, BIN_HZ) / 2 * EARS
    dry = irfft(rfft(dry, SIZE) * np.exp(1j * lead_rad), SIZE)[:, :N]
    dull = signal.sosfilt(signal.cheby2(12, 45, 16000, fs=SR, output="sos"), dry)
    top = signal.sosfilt(signal.cheby2(8, 45, [15500, 17000], "band", fs=SR, output="sos"), dry)
    snap = uniform_filter1d(np.abs(top).mean(axis=0), size=128) > boost_factor(-33)
    mix = dull + top * uniform_filter1d(1. * snap, size=256)
    return roll_off(mix)


dry = scene()
out = record(dry)
dump_mix(out)
```